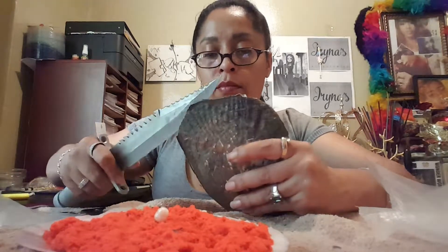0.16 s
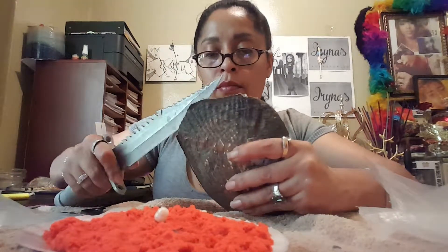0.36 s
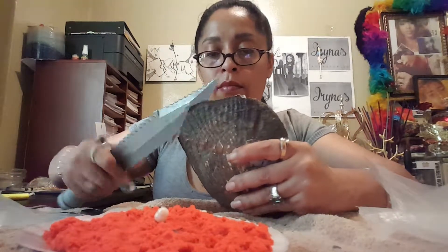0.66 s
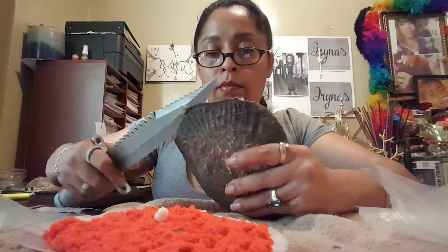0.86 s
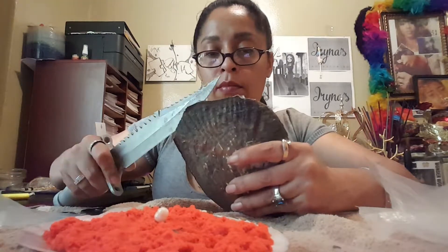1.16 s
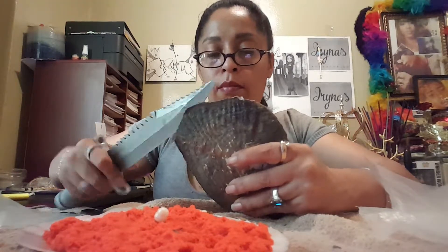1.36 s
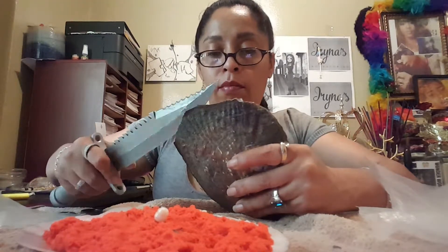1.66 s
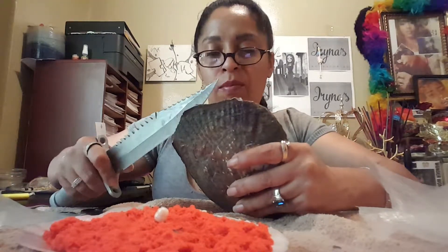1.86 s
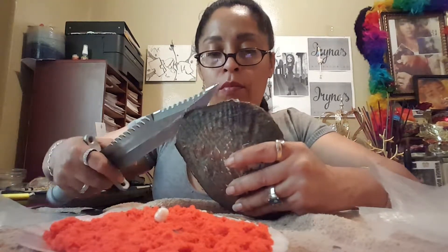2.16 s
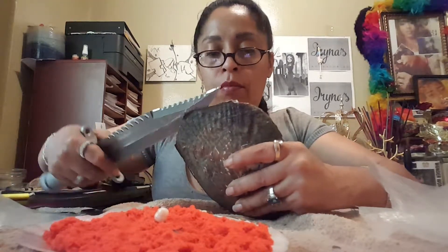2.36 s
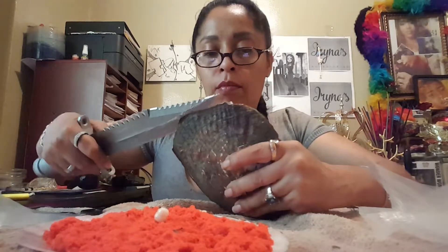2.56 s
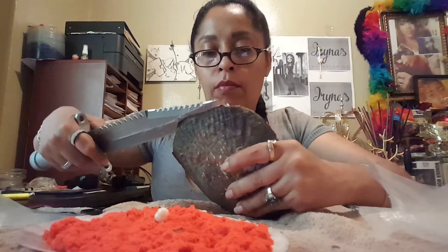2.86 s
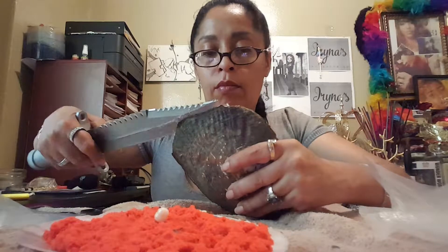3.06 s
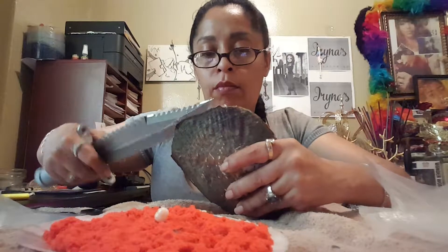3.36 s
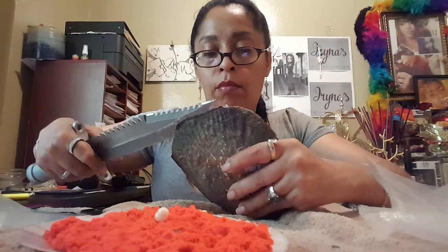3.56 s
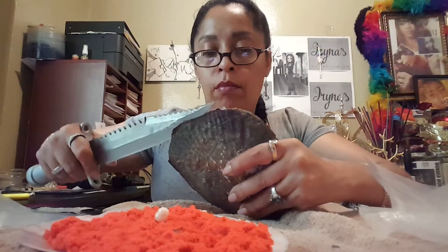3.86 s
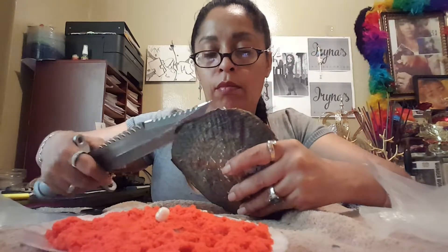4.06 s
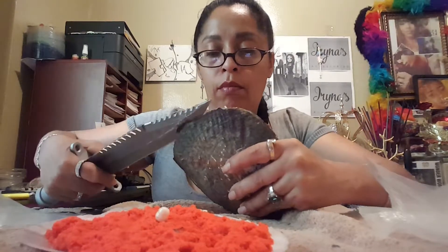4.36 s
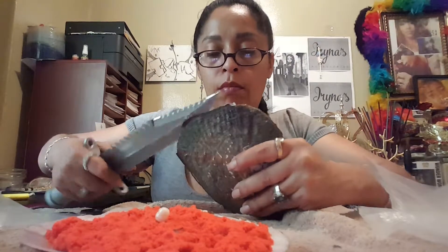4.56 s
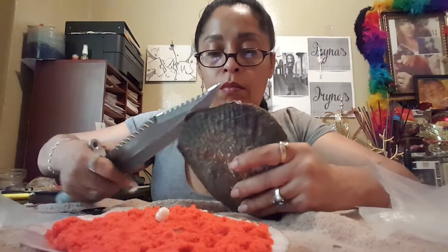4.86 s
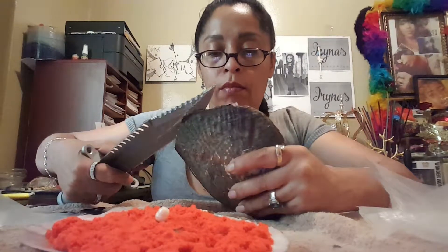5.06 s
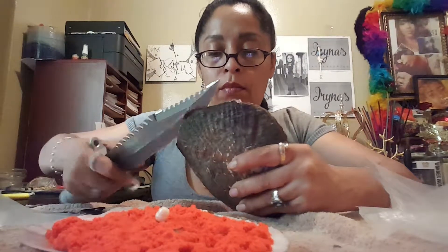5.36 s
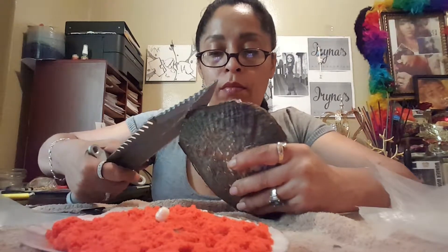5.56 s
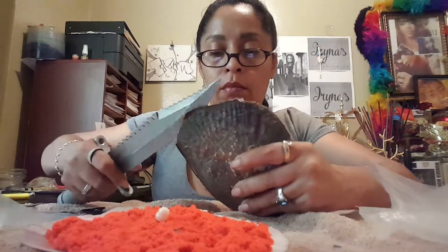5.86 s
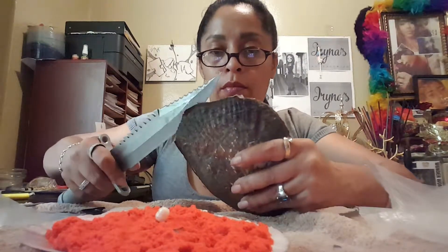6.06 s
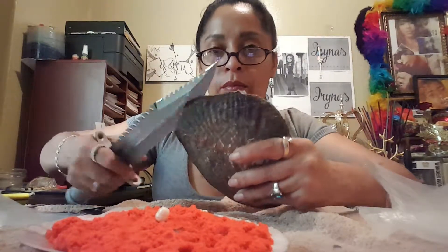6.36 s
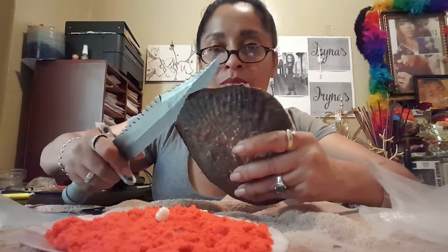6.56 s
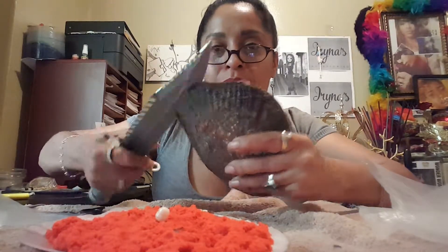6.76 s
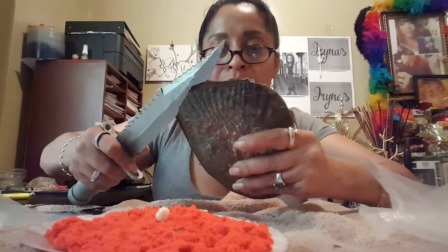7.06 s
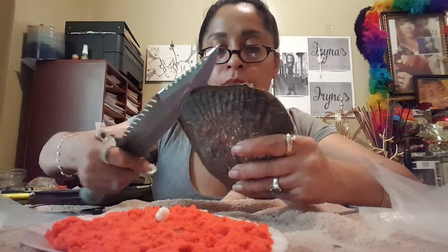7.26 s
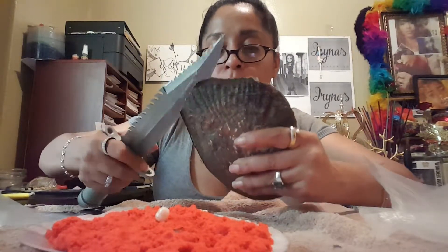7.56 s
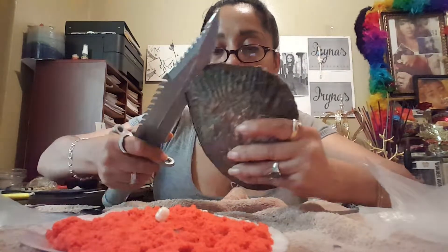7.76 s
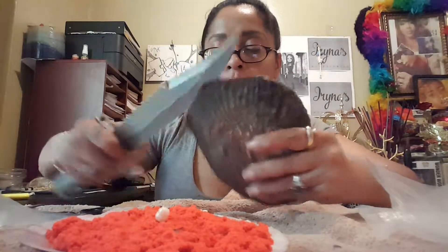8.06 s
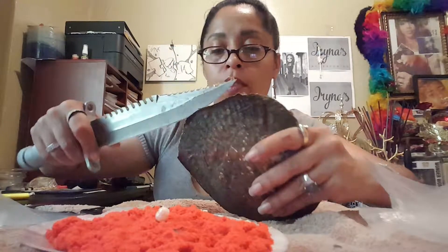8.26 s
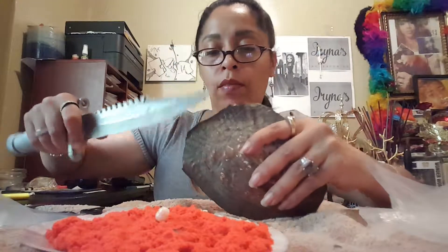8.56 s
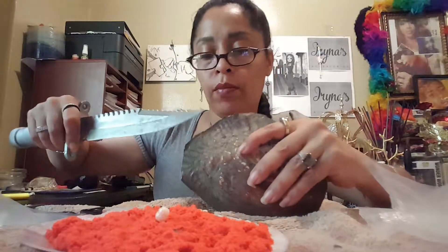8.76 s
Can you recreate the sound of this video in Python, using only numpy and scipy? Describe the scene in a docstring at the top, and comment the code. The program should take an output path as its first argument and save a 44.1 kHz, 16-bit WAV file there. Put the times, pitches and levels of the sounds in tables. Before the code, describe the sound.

Close stereo sound in a small furnished room with short reflections and a faint, slightly wavering low fan hum throughout. A serrated blade works on a large shell in short, irregular strokes: gritty mid-range rasping, dull hollow knocks with very brief ring, and tiny dry ticks. An early knock comes at once, a crack at 0.5 s, a firm knock at 0.9 s, and a cluster around 1.4-2.4 s. A loud, bright crack snaps at 3.2 s, followed by heavy knocks at 4.0 and 4.5 s and a faint table nudge at 4.8 s. Brittle cracks with crumbling come at 5.15 and 5.6 s. Quick slips cluster around 6.2-6.9 s, with lighter scraping after 7 s. A busy flurry near 8.1 s ends in a solid, cushioned thump at 8.2 s; a faint sliding hiss falls in pitch around 8.35 s with light clicks, then only the fan remains.

```python
"""Serrated knife in a large shell, small furnished room

Close to a pair of microphones, a big serrated knife is worked into the seam of a shell held just above a table.
Short strokes grind along the rim: random catches of the edge excite the shell, its rim and the table.
Slips are band-limited knocks with a hollow ring; sharp cracks add dispersed clicks, crumbs and short tones.
An arm nudges the table midway, and toward the end the shell is set down on it. Behind the room's reflections
a fan hums faintly: coloured noise and wavering sine tones."""
import sys
import numpy as np
from scipy import signal
from scipy.fft import rfft, irfft, next_fast_len
from scipy.io import wavfile

SR = 44100
rng = np.random.default_rng(int(sys.argv[2]) if len(sys.argv) > 2 else 0)


def to_wav(sig):
    """Store sig (one row per channel, or 1-D mono) as 16-bit WAV at the path in sys.argv[1].

    Samples outside -1..1 are clipped; the rate is SR.
    """
    pcm = np.clip(np.atleast_2d(sig), -1, 1) * 32767
    pcm = np.round(pcm).astype(np.int16)
    wavfile.write(sys.argv[1], SR, pcm.T)  # frames by channels


N = 393809
TIME = np.arange(N) / SR
AGE = TIME[:int(.25 * SR)]  # time since a blow, s
LEVEL_WINDOW_S = .005  # the level of a blow is its rms over this window

# grinding strokes: hardest moment t/s, length/s, shell pitch f/Hz,
# body level/dB and grit level/dB (both before the swell and the layer trims)
STROKES = [(0.687, 0.12, 606, -41, -70), (0.758, 0.09, 600, -51, -51.5), (0.872, 0.018, 560, -27, -44.5),
           (1.402, 0.19, 626, -36.5, -68), (1.62, 0.054, 640, -30.5, -56), (1.999, 0.095, 560, -39, -59),
           (2.402, 0.23, 536, -33, -61), (2.822, 0.16, 514, -37.5, -58.5), (3.376, 0.16, 495, -40, -56),
           (4.012, 0.12, 560, -37, -64), (4.447, 0.038, 600, -42, -51), (4.49, 0.066, 560, -22, -46),
           (4.584, 0.26, 510, -52, -79), (4.838, 0.14, 650, -31, -56), (4.958, 0.046, 754, -33, -50.5),
           (5.37, 0.37, 620, -38, -76), (6.216, 0.11, 646, -34, -58.5), (6.266, 0.058, 560, -28.5, -62),
           (6.389, 0.077, 658, -38.5, -76), (6.753, 0.11, 607, -26, -47.5), (6.853, 0.11, 630, -36, -64),
           (7.13, 0.24, 630, -47, -59.5), (7.276, 0.23, 560, -39.5, -66), (7.558, 0.053, 650, -30, -73),
           (7.669, 0.11, 694, -30.5, -59.5), (8, 0.062, 715, -41, -50), (8.089, 0.19, 617, -28, -46),
           (8.163, 0.062, 510, -25, -46.5), (8.339, 0.055, 700, -60, -49)]
SWELL_SHARE = 0.49  # part of a stroke spent building up pressure
# colour of the rasping edge: f/Hz, density level/dB per Hz
RASP_COLOUR = [(700, 11.5), (1050, 13), (1450, 19), (1850, 17.5), (2600, 3.5), (3100, -1.5), (4200, 3.5)]
# colour of a tooth on the rim: f/Hz, density level/dB per Hz
GRIT_COLOUR = [(1200, 10), (2400, -2.5), (3200, -6), (4300, -0.5), (6200, -4), (7200, -0.5), (8400, -3),
               (10000, -5), (12500, -15), (14800, -1), (16500, -11)]

# the blade sticks and slips: t/s, knock pitch f/Hz, knock level/dB, rim ring level/dB
SLIPS = [(.012, 626, -23, -41.5), (.221, 600, -43, -66), (0.504, 600, -45, -49), (0.7038, 480, -30.5, -69),
         (0.7281, 544, -24.5, -56), (0.882, 484, -32, -68), (.901, 590, -17, -38), (1.449, 535, -24, -49),
         (1.685, 522, -25.5, -52), (1.6911, 640, -30.5, -53), (1.828, 507, -33, -52),
         (2.0043, 474, -28.5, -62), (2.0278, 565, -24.5, -42), (2.191, 590, -37, -58),
         (2.356, 567, -37, -66), (2.372, 503, -30, -66), (2.385, 506, -30.5, -68), (2.401, 510, -47, -68),
         (2.425, 473, -35, -62), (3.372, 480, -40, -51), (3.4079, 425, -29, -49), (3.726, 443, -31.5, -67),
         (4.034, 455, -14.5, -34.5), (4.042, 387, -24.5, -61), (4.483, 510, -28, -54),
         (4.498, 566, -13.5, -37), (4.559, 516, -42, -69), (4.608, 477, -37, -68), (4.582, 464, -26, -60),
         (4.711, 424, -35, -70), (4.842, 671, -35, -51), (4.857, 536, -26.5, -55), (4.9026, 510, -33, -61),
         (4.9124, 562, -25.5, -41), (5.304, 616, -39.5, -44.5), (5.346, 600, -19, -39),
         (5.54, 600, -39.5, -57), (5.7958, 560, -22.5, -53), (5.862, 570, -30.5, -68),
         (6.2323, 497, -25.5, -64), (6.2448, 554, -22, -61), (6.255, 590, -28.5, -53),
         (6.262, 560, -33, -64), (6.361, 560, -40.5, -71), (6.397, 588, -24.5, -49), (6.743, 600, -31, -64),
         (6.751, 562, -29, -61), (6.763, 580, -26, -54), (6.776, 654, -25, -58), (6.854, 605, -43, -67),
         (7.154, 616, -40, -70), (7.28, 530, -29.5, -64), (7.299, 690, -50, -71), (7.5651, 630, -26, -49),
         (8.089, 530, -20, -55), (8.098, 560, -25, -50.5), (8.156, 450, -21, -42), (8.165, 510, -32, -44),
         (8.174, 487, -32, -60)]
MEDIUM_DB = -26  # knock of a medium slip
SLIP_RING_DB, RING_DAMPING = -5, 0.074  # hollow re knock of a medium slip; dB lost per dB of harder knock
SLIP_CHIP_DB, CHIP_FOLLOWS = -63.5, 1.4  # tooth tick in a medium slip; dB of tick per dB of knock

# sharp cracks, mostly rim breaks, with a few lighter clicks of the blade:
# t/s, knock pitch f/Hz, knock level/dB, hollow ring level/dB re knock,
# crack level/dB, chip level/dB, short tones [f/Hz, level/dB]: low thump, hollow ring and higher clinks
CRACKS = [(0.462, 648, -18, -12.5, -24, -27.5, [(870, -28), (1290, -22.5), (1970, -27), (2600, -32),
          (4050, -36)]), (1.642, 560, -18.5, -3, -38, -34.5, [(920, -38), (1920, -34)]),
          (3.2417, 564.4, -10, -3.5, -27.5, -14.5, [(1320, -26.5), (1970, -21.5), (5900, -27.5),
          (8500, -30)]), (3.2512, 470, -26.5, -13, -25, -23, [(190, -30), (740, -26), (1400, -32.5)]),
          (3.279, 500, -21, -3.5, -29, -31, [(1350, -37), (1960, -36.5)]),
          (5.151, 640, -23, -1.5, -15, -16, [(350, -23), (1270, -29), (1620, -26.5), (2030, -38),
          (4000, -30.5), (6600, -25.5), (8100, -28)]), (5.4158, 530, -30, -1.5, -43, -66, [(980, -36),
          (1950, -44)]), (5.5853, 687, -17, -1, -14, -23, [(355, -21), (1250, -20), (1620, -20.5),
          (2050, -22), (4150, -34.5), (6400, -28.5)]), (6.5314, 646, -34.5, 2, -36.5, -45.5, [(850, -30.5),
          (1040, -30.5), (1770, -34), (2650, -40)]), (6.928, 553, -27.5, -8, -37.5, -52, [(1950, -50)]),
          (8.3795, 560, -34, -16, -42, -75, [(1020, -47), (1400, -45), (1950, -56)]),
          (8.4305, 600, -57, -14, -68, -60, [(3900, -54)])]
# colour of the crack itself: f/Hz, density level/dB per Hz
CRACK_COLOUR = [(200, -17), (400, -7), (750, -2), (1000, -2), (1280, -0.5), (1700, 11), (2000, -1.5),
                (2650, -4), (3200, -9), (4500, -12)]
# colour of its brighter chip sound: f/Hz, density level/dB per Hz
CHIP_COLOUR = [(2300, -14.5), (3200, -8), (4700, -1.5), (5800, -5), (7000, -1), (8300, -1), (9800, -2),
               (12000, -8), (14500, -2.5), (16500, -18.5)]
# the steel blade, damped by the grip: f/Hz, relative level/dB, t60/s
BLADE_MODES = [(1255, -6, .05), (1638, -3, .05), (1956, 0, .05), (3112, -4, .06), (3762, -2, .06),
               (5671, -1, .07), (5870, -1, .07), (7629, 1, .07), (8276, 1, .07), (11251, -6, .07),
               (11457, -7, .07)]
TONE_T60_S, TONE_T60_SLOPE = 0.017, -.4  # short tone at 1 kHz; power of f/kHz, higher dies sooner
DEBRIS_DB, DEBRIS_T60_S, DEBRIS_PER_S = -12, .085, 5000  # following crumbs; level re the crack

# a tooth flicks off a crumb: t/s, chip level/dB
TICKS = [(.172, -57.5), (.221, -53.5), (.557, -51.5), (.767, -55), (.901, -49), (1.1107, -43.5),
         (1.277, -55), (1.599, -57), (1.828, -49.5), (1.945, -57), (1.967, -51.5), (2.242, -58),
         (2.356, -51.5), (2.478, -49.5), (2.814, -52), (3.231, -53), (3.865, -53), (4.034, -79),
         (4.272, -54.5), (4.477, -47.5), (4.498, -62), (4.845, -51), (4.933, -46), (5.346, -55),
         (5.96, -49.5), (6.252, -47), (6.2595, -50), (6.324, -75), (6.4, -58), (6.509, -50.5),
         (6.5203, -37.5), (6.737, -53), (6.753, -52), (6.765, -51), (7.038, -51.5), (7.1014, -51),
         (7.525, -59), (7.693, -46.5), (8.006, -58), (8.053, -41.5), (8.075, -58), (8.101, -46),
         (8.154, -52), (8.174, -64), (8.358, -58)]
MEDIUM_TICK_DB, TICK_FOLLOWS = -49.5, 0.76  # medium chip; dB of force per dB of chip
TICK_HZ, TICK_KNOCK_DB, TICK_RIM_DB = 590, -46, -51.5  # the shell barely answers a medium tick

# the edge slides off the rim: t/s, hiss pitch f/Hz, level/dB
SLIDE_OFF = [(8.32, 10000, -66), (8.335, 7500, -53), (8.353, 6300, -47), (8.364, 3800, -60),
             (8.41, 3100, -72), (8.435, 3600, -63), (8.47, 3300, -76)]

# table nudged by an arm, then shell set down on it: t/s, knock pitch f/Hz, knock level/dB,
# rim ring level/dB, thump level/dB
BUMPS = [(4.782, 454.3, -49, -70, -34), (8.1946, 440, -10.5, -39, -13.5)]
BUMP_RING_DB, BUMP_CHIP_DB = -15, -13  # hollow ring re knock; chip re rim ring
BUMP_JOLT_DB = -26  # jolt re swing: the cloth on the table takes the edge off a bump

# the hollow between the two halves, damped by the hand: f/Hz, relative level/dB, t60/s
SHELL_MODES = [(370.5, 1.5, 0.11), (433.6, 2, 0.054), (510, -5, 0.011), (560, 4.5, 0.027), (600, -3, 0.048),
               (680, 0.5, 0.031), (751, 4.5, 0.013), (892, -5.5, 0.033)]
# the thin rim of the shell: f/Hz, relative level/dB, t60/s
RIM_MODES = [(890, 10.5, 0.028), (1120, -0.5, 0.017), (1743, 7.5, 0.01), (1952, 6, 0.041),
             (2030, -3.5, 0.009), (2320, 8.5, 0.016), (2687, -19.5, 0.045)]
RIM_VARY_DB, RIM_CLICK_DB = 3, -3.5  # spread of the mode levels; dry click re ring
# the table under the arms: f/Hz, relative level/dB, t60/s
TABLE_MODES = [(68, 1.5, 0.11), (101, 8, 0.064), (124, -7, 0.25), (159, -2, 0.06)]
# how hard the arms lean on the table: t/s, level/dB of the thump that a medium slip sends into it
LEAN = [(0, -44.5), (.72, -44), (.89, -38.5), (1.1, -53), (1.62, -57), (1.69, -34.5), (2, -49),
        (2.8, -39.5), (3.25, -45), (3.42, -34), (4.5, -31), (4.82, -30.5), (4.92, -48), (5.15, -41),
        (5.4, -47.5), (5.6, -59), (7.3, -59), (8.2, -70)]
THUMP_FOLLOWS = 0.51  # dB of thump per dB of knock

# the left microphone leads, least for the shell's body: f/Hz, lead/s
LEFT_LEAD = [(500, .00004), (1000, .00014), (1250, .00018), (1650, .00033), (2100, .00039), (4000, .000355)]
# light contacts sent into the room: f/Hz, send level/dB
LIGHT_INTO_ROOM = [(40, 2.5), (900, -5), (2500, -1), (6000, -1.5), (18000, -9)]
# sharp cracks throw their treble into the room: f/Hz, send level/dB
CRACKS_INTO_ROOM = [(300, -2.5), (700, -2), (1300, -9), (2500, 2), (5000, -0.5), (14000, -3)]
# first reflections, after the direct sound: delay at left/s, delay at right/s, level/dB
ECHOES = [(.0047, 0.0025, -11.5), (.0086, 0.0074, -22.5), (0.0118, 0.014, -12.5), (.0141, 0.018, -21.5)]
# reverberant tail: f/Hz, level/dB re the sound sent in
ROOM_LEVEL = [(80, -21.5), (300, -6), (650, -9.5), (1200, -3.5), (2500, -5.5), (7000, -2), (15000, 1.5)]
# late decay of the tail: f/Hz, t60/s
ROOM_T60 = [(80, 0.38), (600, 0.26), (2000, 0.22), (7000, 0.22), (15000, 0.099)]
# diffuse sound at the two microphones: f/Hz, left-right correlation (1 = alike)
LIKENESS = [(50, 0.56), (150, 0.91), (300, 0.86), (640, 0.47), (1300, 0), (16000, 0)]

# colour of the room air and fan: f/Hz, density level/dB per Hz
AIR_COLOUR = [(20, -30), (45, -5), (70, 0.5), (100, -3), (150, -3.5), (185, 1), (250, 2), (340, -3),
              (750, -7), (1500, -22), (2750, -25.5), (3100, -30.5), (4000, -30), (4700, -34), (6100, -35.5),
              (6750, -31), (7300, -38), (9000, -33), (10200, -40), (15500, -34.5)]
AIR_DB = -49  # rms
# fan tones: f/Hz, middle rms level/dB
FAN_TONES = [(178.5, -60), (232.5, -57.5), (328.4, -66), (464, -56), (522.2, -62.5), (581.4, -66),
             (640.6, -65.5), (698, -69.5), (812.9, -69), (1048, -78), (1217, -78), (2379, -86), (2606, -86),
             (6675, -87)]
HUM_WAVER_DB, HUM_WANDER_RAD = 1.8, .35  # slow spread of level and phase


def scraping(swell_db=16, body_db=1, rasp_db=-18, grit_db=1.5, rumble_db=3, pitch_spread=1.18):
    """Pressure swells and eases in each stroke; catches on ridges rattle the shell and crumble its rim."""
    ridges = [grains(per_s=170) for _ in range(3)]
    catches = sum(ridges)
    crumbs = rms_one(catches) + rms_one(grains(per_s=300)) + .7 * rms_one(grains(per_s=2500))
    rasp, grit = colour(crumbs, RASP_COLOUR), colour(crumbs, GRIT_COLOUR)
    rumble = band(catches, 55, 290)
    out = np.zeros(N)
    for hardest, length, hz, stroke_body_db, stroke_grit_db in STROKES:
        phase = (TIME - hardest) / length
        pressure = np.interp(phase, [-SWELL_SHARE, 0, 1 - SWELL_SHARE], [0, 1, 0])
        on = pressure > 0
        force = from_db(swell_db * (pressure[on] - 1.34)) * np.minimum(1, 5 * pressure[on])
        hollow = 0
        for k, ridge in enumerate(ridges):  # each set of ridges has its own shell pitch
            answer = knock(hz * pitch_spread ** (k - 1), ring_db=-1)
            hollow = hollow + signal.fftconvolve(ridge[on], answer)[:len(force)]
        body = rms_one(hollow) + from_db(rasp_db) * rms_one(rasp[on])
        stroke = from_db(stroke_body_db + body_db) * body
        stroke += from_db(stroke_grit_db + grit_db) * rms_one(grit[on])
        stroke += from_db(table_db(hardest, stroke_body_db) + rumble_db) * rms_one(rumble[on])
        out[on] += force * stroke
    return out


def grains(per_s):
    """Tiny catches of the edge, at random moments and of very uneven size."""
    sizes = from_db(4 * np.minimum(rng.exponential(1, N), 3.5)) * rng.choice([-1, 1], N)
    return sizes * (rng.random(N) < per_s / SR)


def slips():
    """The stuck blade lets go: dull knocks that brighten with force."""
    out = np.zeros(N)
    for s, hz, knock_db, rim_db in SLIPS:
        force_db = knock_db - MEDIUM_DB
        ring_db = SLIP_RING_DB - RING_DAMPING * force_db  # a harder push also damps the hollow
        tick_db = SLIP_CHIP_DB + CHIP_FOLLOWS * force_db
        add(out, s, contact(hz, knock_db, ring_db, rim_db, tick_db, table_db(s, knock_db)))
    return out


def cracks(blade_db=-12):
    """Rim breaks and a few lighter blade clicks: knock, thump, crack, chip, ring of steel and short tones."""
    out = np.zeros(N)
    for s, hz, knock_db, ring_db, crack_db, chip_db, tones in CRACKS:
        hit = from_db(knock_db) * knock(hz, ring_db, jolt_db=-14)
        hit += from_db(table_db(s, knock_db)) * thump()
        crack = fracture(CRACK_COLOUR, width_hz=340, crumble_db=-12) + debris(CRACK_COLOUR)
        chip = fracture(CHIP_COLOUR, width_hz=870, crumble_db=-7) + debris(CHIP_COLOUR)
        hit += from_db(crack_db) * crack + from_db(chip_db) * chip
        steel = unit_hit(struck(BLADE_MODES, detune=0))
        hit += from_db(min(crack_db, chip_db) + blade_db) * steel
        for tone_hz, tone_db in tones:
            hit += from_db(tone_db) * short_tone(tone_hz)
        add(out, s, hit)
    return out


def ticks():
    """Light clicks of single teeth on the rim, with a small answer from shell and table."""
    out = np.zeros(N)
    for s, chip_db in TICKS:
        force_db = TICK_FOLLOWS * (chip_db - MEDIUM_TICK_DB)
        knock_db, rim_db = TICK_KNOCK_DB + force_db, TICK_RIM_DB + force_db
        add(out, s, contact(TICK_HZ, knock_db, SLIP_RING_DB, rim_db, chip_db, table_db(s, knock_db)))
    return out


def slide_off(octaves=0.24):
    """As the contact runs toward the tip, the free length of steel grows and its hiss falls in pitch."""
    s, hz, db = np.transpose(SLIDE_OFF)
    on = (TIME > s[0]) & (TIME < s[-1])
    pitch = np.interp(TIME[on], s, hz)
    hiss = 0
    for centre in np.geomspace(2500, 13000, 10):  # each noise band sounds while the pitch is near it
        nearness = np.exp(-.5 * (np.log2(centre / pitch) / octaves) ** 2)
        noise = band(rng.standard_normal(len(pitch)), centre / 1.1, centre * 1.1)
        hiss = hiss + nearness * rms_one(noise)
    out = np.zeros(N)
    out[on] = rms_one(hiss) * from_db(np.interp(TIME[on], s, db))
    return out


def bumps():
    """Bumps on the table: a soft jolt of the shell and a thump of the table."""
    out = np.zeros(N)
    for s, hz, knock_db, rim_db, thump_db in BUMPS:
        tick_db = rim_db + BUMP_CHIP_DB
        add(out, s, contact(hz, knock_db, BUMP_RING_DB, rim_db, tick_db, thump_db, BUMP_JOLT_DB))
    return out


def contact(hz, knock_db, ring_db, rim_db, tick_db, thump_db, jolt_db=-9):
    """One blow: knock of the shell, short ring of the rim, tick of the tooth, thump of the table."""
    hit = from_db(knock_db) * knock(hz, ring_db, jolt_db=jolt_db)
    hit += from_db(rim_db) * rim()
    hit += from_db(tick_db) * fracture(GRIT_COLOUR, width_hz=1100, crumble_db=-7)
    return hit + from_db(thump_db) * thump()


def knock(hz, ring_db, spread=1.201, ring_spread=1.27, jolt_db=-9, jolt_spread=1.273):
    """A slip jolts the held shell, which swings for two or three cycles and leaves its hollow ringing."""
    click = 1. * (AGE == 0)
    swing = unit_hit(band(click, hz / spread, hz * spread))
    jolt = unit_hit(band(click, hz / jolt_spread, hz * jolt_spread))
    hollow = unit_hit(band(struck(SHELL_MODES), hz / ring_spread, hz * ring_spread))
    return unit_hit(swing + from_db(jolt_db) * jolt) + from_db(ring_db) * hollow


def rim():
    """The edge meets the thin rim: a dry click and a very short ring."""
    click = unit_hit(band(1. * (AGE == 0), 1100, 2000))
    ring = unit_hit(struck(RIM_MODES, vary_db=RIM_VARY_DB))
    return unit_hit(ring + from_db(RIM_CLICK_DB) * click)


def fracture(spectrum, width_hz, crumble_db, count=8):
    """A sharp click and milliseconds of crumbling; slow bending waves make its lower part arrive late."""
    crumble = rng.standard_normal(len(AGE)) * (rng.random(len(AGE)) < 3000 / SR)
    crumble *= from_db(-60 * AGE / .014)
    click = unit_hit(1. * (AGE == 0)) + from_db(crumble_db) * unit_hit(crumble)
    # a chain of all-passes delays each region without changing its level
    centres = 1000 * 9 ** ((np.arange(count) + rng.random(count)) / count)
    radii = np.exp(-np.pi * width_hz * np.sqrt(centres / centres[0]) / SR)
    pulls = -2 * radii * np.cos(2 * np.pi * centres / SR)
    all_passes = [[r * r, p, 1, 1, p, r * r] for r, p in zip(radii, pulls)]
    smeared = signal.sosfilt(all_passes, click + 1e-18)
    return unit_hit(colour(smeared, spectrum))


def debris(spectrum):
    """Crumbling goes on for a few hundredths of a second after a crack."""
    crumbs = rng.standard_normal(len(AGE)) * (rng.random(len(AGE)) < DEBRIS_PER_S / SR)
    dying = crumbs * from_db(-60 * AGE / DEBRIS_T60_S)
    return from_db(DEBRIS_DB) * unit_hit(colour(dying, spectrum))


def short_tone(hz, spread=1.1):
    """One short tone of a crack: a low thump, a hollow ring or a higher clink, by its pitch."""
    t60 = TONE_T60_S * (hz / 1000) ** TONE_T60_SLOPE
    tone = from_db(-60 * AGE / t60) * np.sin(2 * np.pi * hz * AGE)
    return unit_hit(band(tone, hz / spread, hz * spread))


def struck(modes, vary_db=2, detune=0.024):
    """Decaying modes; strengths and pitches vary at random with the grip and where the blow lands."""
    hz, db, t60 = np.transpose(modes)[:, :, None]
    strength = db + vary_db * rng.standard_normal(hz.shape)
    pitch = hz * (1 + detune * rng.standard_normal(hz.shape))
    signs = (-1) ** np.arange(len(hz))[:, None]
    decay = from_db(strength - 60 * AGE / t60)
    return np.sum(signs * decay * np.sin(2 * np.pi * pitch * AGE), axis=0)


def thump():
    """A dull push through the arms, after which the table rings."""
    push = unit_hit(band(1. * (AGE == 0), 62, 170))
    ring = unit_hit(band(struck(TABLE_MODES), 50, 600))
    return unit_hit(push + ring)


def table_db(s, shell_db):
    """What reaches the table grows with the lean of the arms and with the force on the shell."""
    lean_db = np.interp(s, *np.transpose(LEAN))
    return lean_db + THUMP_FOLLOWS * (shell_db - MEDIUM_DB)


def direct(x):
    """The straight path to the microphone pair; the right one hears each frequency a little later."""
    size = next_fast_len(N + SR // 10)
    hz = np.fft.rfftfreq(size, 1 / SR)
    late = rfft(x, size) * np.exp(-2j * np.pi * hz * at_hz(LEFT_LEAD, hz))
    return np.array([x, irfft(late, size)[:N]])


def at_microphones(x, left_s, right_s):
    """A reflection reaches the two microphones with different delays."""
    size = next_fast_len(N + SR // 10)
    hz = np.fft.rfftfreq(size, 1 / SR)
    delays = np.array([[left_s], [right_s]])
    return irfft(rfft(x, size) * np.exp(-2j * np.pi * hz * delays), size)[:, :N]


def room(x, first_s=0.0076, early_t60=0.07, early_db=3):
    """A few near reflections, a dense early cluster, then a short tail that dies band by band."""
    t = TIME[:SR // 2]
    edges = np.geomspace(50, 19000, 19)
    noises, tail = [diffuse(len(t)), diffuse(len(t))], 0
    onset = np.clip((t - first_s / 2) / (first_s / 2), 0, 1) ** 2
    for k, (low, high) in enumerate(zip(edges, edges[1:])):
        hz = np.sqrt(low * high)
        decay = from_db(-60 * t / at_hz(ROOM_T60, hz)) + from_db(early_db - 60 * t / early_t60)
        part = band(noises[k % 2], low, high) * decay * onset
        share = 2 * (high - low) / SR  # this band's part of a click's energy
        part *= np.sqrt(2 * share / np.sum(part ** 2))
        tail = tail + part * from_db(at_hz(ROOM_LEVEL, hz))
    echoes = sum(from_db(db) * at_microphones(x, left, right) for left, right, db in ECHOES)
    return echoes + signal.fftconvolve(x[None], tail, axes=1)[:, :N]


def diffuse(size):
    """White stereo noise, alike in the bass and unrelated in the treble."""
    mid, side = rfft(rng.standard_normal((2, size)))
    alike = np.clip(at_hz(LIKENESS, np.fft.rfftfreq(size, 1 / SR)), -1, 1)
    common, opposed = np.sqrt((1 + alike) / 2) * mid, np.sqrt((1 - alike) / 2) * side
    return irfft(common + opposed * [[1], [-1]], size)


def fan():
    """Soft rushing air with nearly steady motor and blade tones."""
    rush = colour(diffuse(next_fast_len(N))[:, :N], AIR_COLOUR)
    tones = 0
    for hz, db in FAN_TONES:
        level = from_db(db + HUM_WAVER_DB * drift(4.4))
        tones = tones + level * np.sin(2 * np.pi * hz * TIME + HUM_WANDER_RAD * drift(9.7))
    return from_db(AIR_DB) * rms_one(rush) + np.sqrt(2) * tones  # root 2: rms to peak


def drift(rate):
    """Slow random wander: straight lines between values of spread 1, drawn at a rate per second."""
    knots = rng.standard_normal(N // 40)
    return np.interp(TIME * rate, np.arange(len(knots)), knots)


def from_db(db):
    """Decibels to gain."""
    return 10 ** (np.asarray(db) / 20)


def rms_one(x):
    """Scale to rms 1."""
    return x / np.sqrt(np.mean(x ** 2) + 1e-20)


def unit_hit(x):
    """Scale a transient to the energy of rms 1 held for the level window."""
    return x * np.sqrt(LEVEL_WINDOW_S * SR / (np.sum(x ** 2) + 1e-20))


def at_hz(points, hz):
    """Read a table on a log-frequency axis."""
    f, value = np.transpose(points)
    return np.interp(np.log(np.maximum(hz, 1)), np.log(f), value)


def colour(x, spectrum):
    """Causal (minimum-phase) filter with a given spectrum that falls away beyond the table's ends."""
    size = 2 * next_fast_len(x.shape[-1] // 2 + 1)
    hz = np.fft.rfftfreq(size, 1 / SR) + 1
    ends = np.minimum(1, hz / spectrum[0][0]) ** 2 * np.minimum(1, spectrum[-1][0] / hz) ** 2
    # folding the cepstrum onto positive time gives the minimum phase
    cepstrum = irfft(np.log(from_db(at_hz(spectrum, hz)) * ends + 1e-6))
    cepstrum[1:size // 2] *= 2
    cepstrum[size // 2 + 1:] = 0
    return irfft(rfft(x, size) * np.exp(rfft(cepstrum)), size)[..., :x.shape[-1]]


def band(x, low, high):
    """Causal band-pass."""
    return signal.sosfilt(signal.butter(2, [low, high], "band", fs=SR, output="sos"), x + 1e-18)


def add(out, s, sound):
    """Mix a sound in at a given time."""
    start = max(0, round(s * SR))
    out[start:start + len(sound)] += sound[:max(0, len(out) - start)]


def scene(right_db=0.55):
    """Knife and shell close to the microphones, the room and the fan behind; the right side is louder."""
    light = scraping() + slips() + ticks() + slide_off() + bumps()
    sharp = cracks()
    reflected = room(colour(sharp, CRACKS_INTO_ROOM) + colour(light, LIGHT_INTO_ROOM))
    return (direct(light + sharp) + reflected + fan()) * from_db([[-right_db], [right_db]])


def record(dry, top=0.86):
    """The sharpest peaks are rounded and the treble above 16.4 kHz is cut."""
    rounded = top * np.tanh(dry / top)
    return signal.sosfilt(signal.ellip(10, .1, 80, 16400, fs=SR, output="sos"), rounded)


dry = scene()
out = record(dry)
to_wav(out)
```